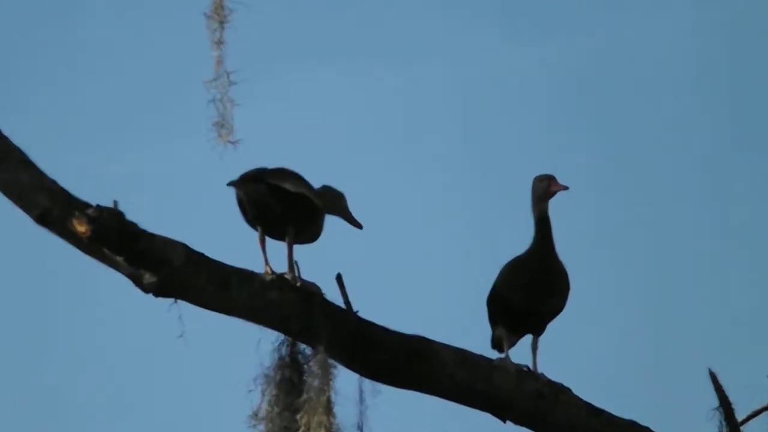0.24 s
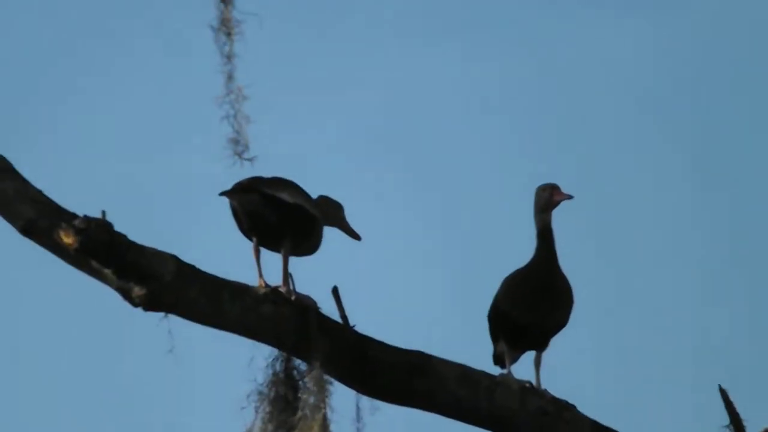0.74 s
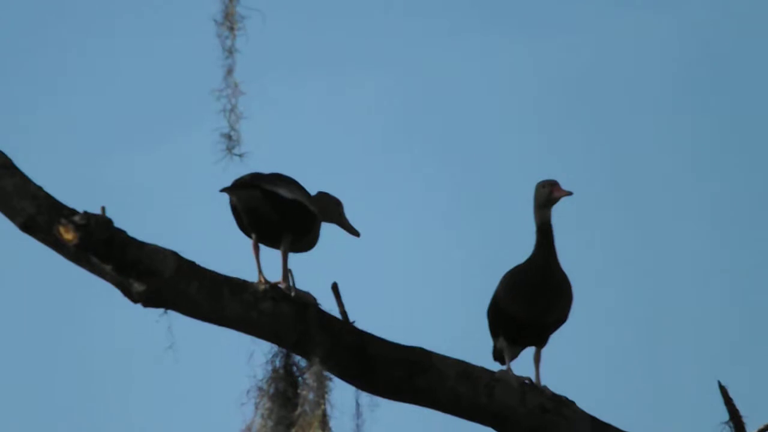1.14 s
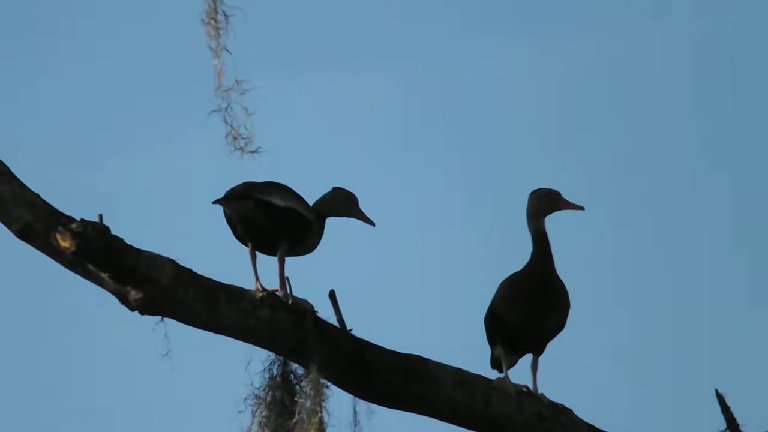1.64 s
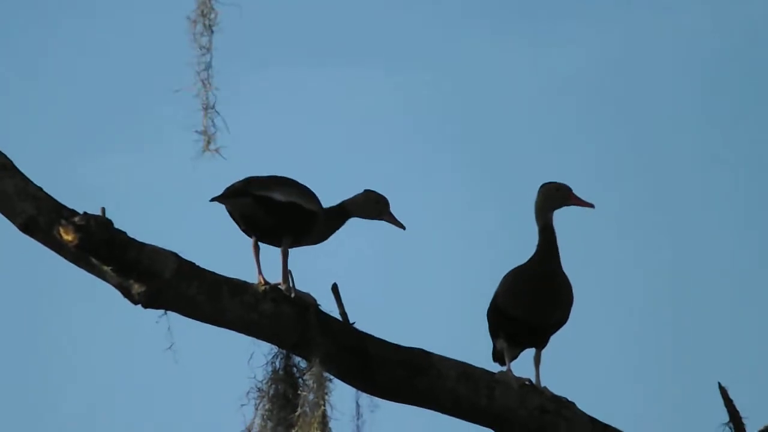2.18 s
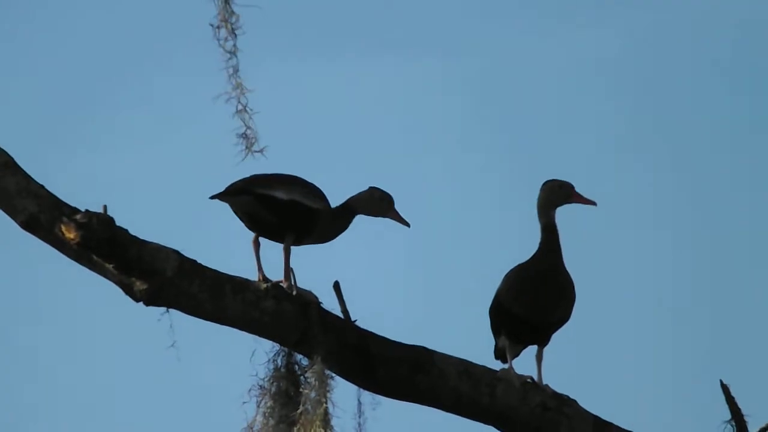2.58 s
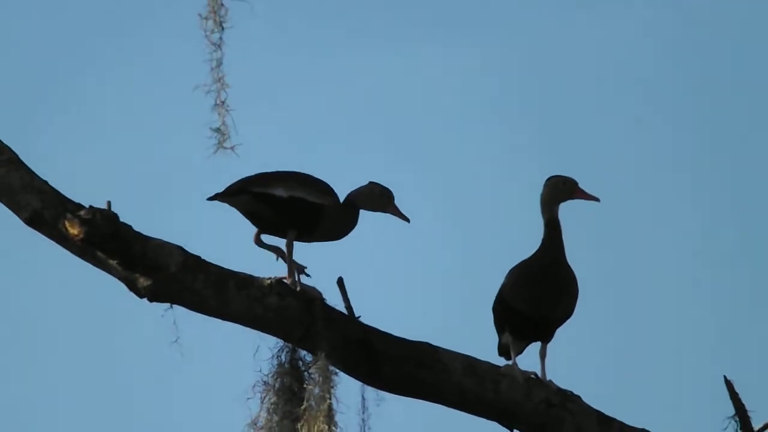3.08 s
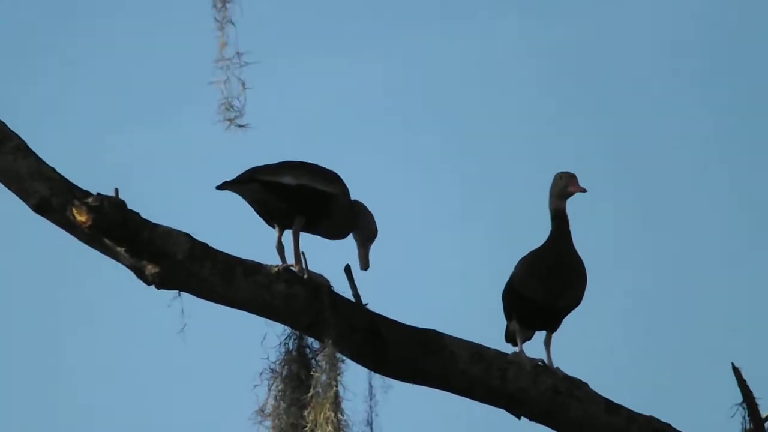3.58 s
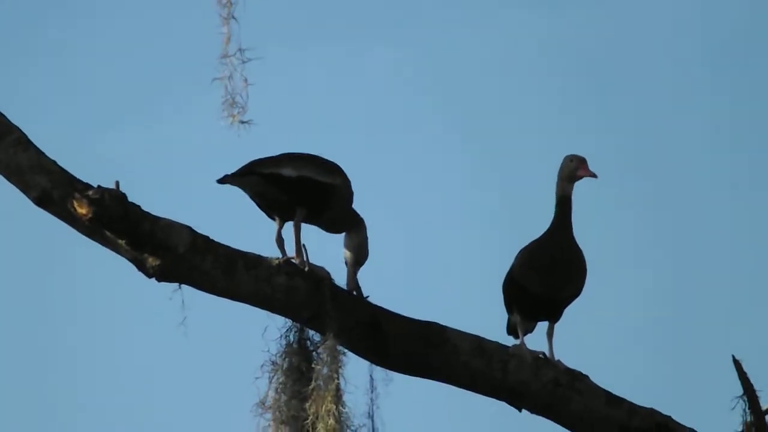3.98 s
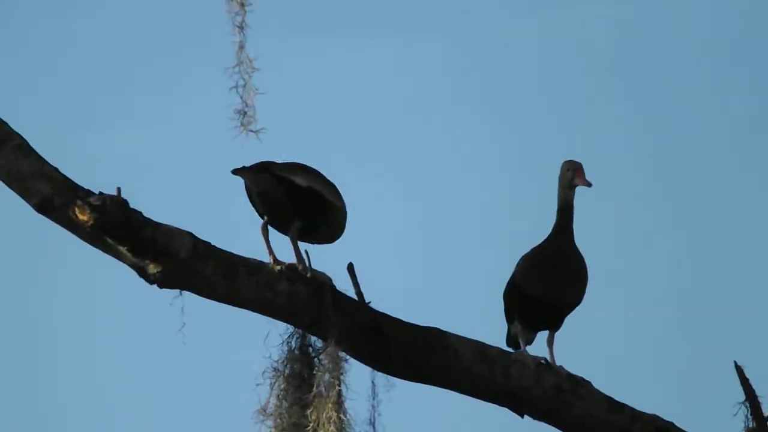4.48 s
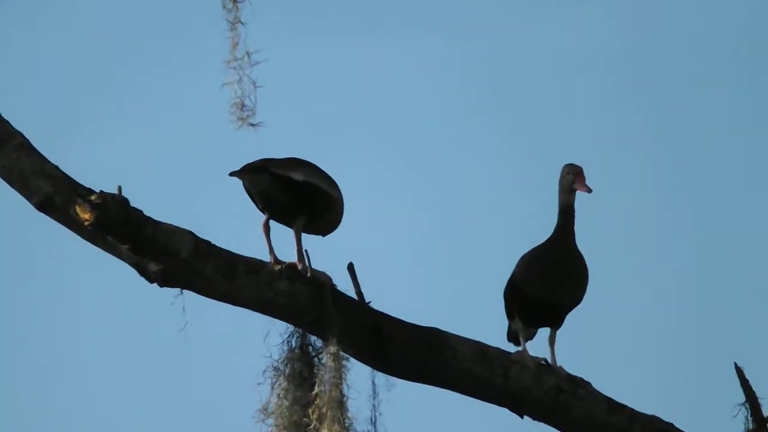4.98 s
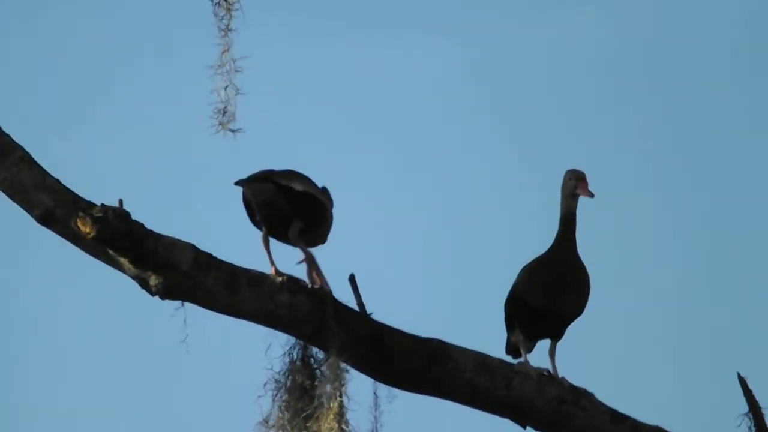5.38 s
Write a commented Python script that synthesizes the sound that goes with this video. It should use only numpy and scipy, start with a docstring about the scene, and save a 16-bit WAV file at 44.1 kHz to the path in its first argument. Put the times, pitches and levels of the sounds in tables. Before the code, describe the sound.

Close snap first, then a flock of whistling ducks: bright, nearly pure squeals that leap upward, a rapid chatter of short arched notes, and four strong whoops before the calls thin away. Trees and water scatter short echoes. The outdoor microphone also picks up hiss, low rumble, distant ringing frogs, fast insect chirps and a slowly rising engine hum.

```python
"""Whistling ducks over a wetland

A flock squeals, whoops and pips, several birds at once: nearly pure gliding tones with weak overtones,
heard direct and scattered by trees and water. Two snaps close by are struck bodies with fast-dying modes.
Behind lie a frog chorus of short rings, a chirping insect, thin whistles and faint squeals without
overtones, a far engine as a fuzzy hum, and outdoor hiss over low rumble."""
import sys
import numpy as np
from scipy import signal
from scipy.io import wavfile
from scipy.ndimage import uniform_filter1d

SR = 44100
rng = np.random.default_rng(int(sys.argv[2]) if len(sys.argv) > 2 else 0)


def wav_out(sig):
    """Save sig, one row per channel (or a flat mono array), as 16-bit PCM at SR to the path in sys.argv[1]."""
    wavfile.write(sys.argv[1], SR, np.round(np.clip(np.atleast_2d(sig).T, -1, 1) * 32767).astype(np.int16))


N = 248283  # length in samples

# Short duck notes. Each row: start in seconds, length in seconds, pitch in Hz at the start, at the turn
# and at the end, place of the turn as a share of the length, effort in dB before voice and throat.
PIPS = [(0.79, 0.031, 2060, 2285, 2110, 0.27, -37), (1.632, 0.045, 3210, 2890, 2940, 0.7, -33),
        (1.799, 0.027, 3460, 3380, 2410, 0.19, -39), (1.849, 0.027, 2860, 2845, 2720, 0.5, -24.5),
        (1.936, 0.034, 2840, 2800, 1870, 0.3, -27.5), (2.009, 0.09, 2073, 2872, 1960, 0.58, -20),
        (2.022, 0.016, 2710, 2790, 2640, 0.41, -25), (2.105, 0.032, 2780, 2850, 2690, 0.23, -20.5),
        (2.197, 0.015, 2700, 3077, 3270, 0.96, -18.5), (2.197, 0.028, 2240, 2440, 2520, 0.8, -37.5),
        (2.214, 0.04, 2890, 2960, 2150, 0.18, -30), (2.284, 0.015, 2705, 3024, 3090, 0.82, -19),
        (2.292, 0.021, 2370, 2430, 2130, 0.2, -34.5), (2.296, 0.039, 3440, 3530, 2470, 0.17, -25),
        (2.371, 0.014, 2746, 3005, 3070, 0.9, -20.5), (2.377, 0.052, 2214, 2516, 2520, 0.62, -34),
        (2.383, 0.037, 3280, 3524, 2380, 0.17, -24), (2.45, 0.016, 1930, 2230, 2220, 0.51, -34.5),
        (2.458, 0.011, 2800, 2944, 3000, 1, -21.5), (2.467, 0.046, 3700, 3500, 3090, 0.3, -23.5),
        (2.485, 0.034, 2570, 2510, 2220, 0.37, -38), (2.545, 0.011, 2830, 2970, 3060, 0.9, -24),
        (2.553, 0.034, 2290, 2346, 1970, 0.27, -29), (2.555, 0.042, 3500, 3566, 2420, 0.27, -20),
        (2.592, 0.027, 2500, 2600, 2200, 0.2, -36), (2.634, 0.015, 2830, 2924, 3000, 0.9, -26),
        (2.64, 0.031, 3190, 3600, 3160, 0.53, -20.5), (2.654, 0.049, 2350, 2346, 1710, 0.3, -28.5),
        (2.72, 0.098, 1993, 2492, 1850, 0.32, -27), (2.723, 0.055, 3255, 3550, 2660, 0.45, -20),
        (2.742, 0.04, 2730, 3094, 2620, 0.31, -27.5), (2.809, 0.014, 2790, 2830, 2860, 0.9, -27),
        (2.813, 0.05, 3200, 3410, 2430, 0.45, -22), (2.865, 0.038, 2055, 2135, 2180, 0.42, -34),
        (2.892, 0.057, 2150, 2194, 1780, 0.29, -29.5), (2.917, 0.042, 2955, 3510, 2270, 0.35, -23.5),
        (2.988, 0.058, 2260, 2326, 1720, 0.45, -27), (3.012, 0.04, 3060, 3500, 2360, 0.52, -22.5),
        (3.076, 0.031, 2420, 3020, 2730, 0.45, -27), (3.083, 0.025, 2250, 2240, 2140, 0.1, -36),
        (3.103, 0.06, 2145, 2298, 1784, 0.4, -29), (3.112, 0.043, 2970, 3580, 2500, 0.35, -23),
        (3.168, 0.044, 2840, 3083, 2830, 0.38, -24.5), (3.204, 0.054, 2920, 3600, 3050, 0.5, -23.5),
        (3.22, 0.05, 2470, 2340, 1740, 0.21, -29), (3.26, 0.05, 2810, 3235, 2970, 0.4, -20),
        (3.314, 0.033, 3054, 3510, 3130, 0.76, -24.5), (3.349, 0.018, 2814, 3207, 3280, 0.97, -17),
        (3.378, 0.011, 3100, 3010, 2690, 0.071, -22.5), (3.406, 0.034, 2490, 2465, 2060, 0.081, -32),
        (3.444, 0.019, 2870, 3234, 3300, 0.9, -17.5), (3.474, 0.0082, 2970, 2994, 2710, 0.072, -20),
        (3.494, 0.038, 3197, 3290, 2830, 0.58, -15.5), (3.529, 0.013, 2520, 2470, 2150, 0.085, -37),
        (3.539, 0.035, 2840, 3197, 2810, 0.37, -19), (3.592, 0.036, 1970, 2040, 1820, 0.28, -36),
        (3.633, 0.028, 2743, 3350, 3400, 0.85, -17), (3.707, 0.039, 2150, 2040, 1590, 0.077, -33),
        (3.734, 0.032, 2780, 3270, 2980, 0.42, -18), (3.814, 0.056, 1930, 2000, 1574, 0.29, -36.5),
        (3.923, 0.077, 1694, 2030, 1460, 0.27, -38), (4.031, 0.038, 2085, 2524, 2401, 0.85, -30.5),
        (4.066, 0.03, 2650, 2733, 2610, 0.31, -32), (4.079, 0.019, 2950, 3180, 3100, 0.7, -33),
        (4.15, 0.036, 2650, 2758, 2650, 0.35, -27), (4.175, 0.028, 2870, 3155, 3030, 0.53, -32.5),
        (4.233, 0.041, 2700, 2800, 2600, 0.57, -26.5), (4.268, 0.024, 2920, 3110, 3080, 0.81, -34),
        (4.325, 0.039, 2710, 2866, 2580, 0.43, -26.5), (4.412, 0.039, 2714, 2881, 2610, 0.6, -27),
        (4.499, 0.042, 2693, 2926, 2610, 0.55, -26.5), (4.542, 0.023, 2530, 2570, 2400, 0.4, -45),
        (4.59, 0.031, 2660, 2880, 2690, 0.62, -26.5), (4.684, 0.038, 2657, 2937, 2700, 0.7, -28.5),
        (4.785, 0.034, 2635, 2790, 2610, 0.51, -29), (5.366, 0.039, 1630, 1776, 1800, 0.57, -42.5),
        (5.47, 0.043, 1680, 1713, 1510, 0.31, -41.5), (5.56, 0.066, 1815, 1795, 1640, 0.09, -40)]
# Long squeals as curves; the one from 1.02 to 1.66 s runs over two of them.
# Each row of a curve: time in seconds, pitch in Hz, effort in dB.
SQUEALS = [
    [(0.765, 2035, -54), (0.785, 2740, -23.5), (0.81, 3320, -22.5), (0.845, 3397, -15), (0.867, 3320, -21),
     (0.88, 2840, -24.5), (0.908, 2620, -33)],
    [(1.02, 2543, -28), (1.035, 3610, -37), (1.055, 4340, -42), (1.072, 4340, -42.5), (1.086, 3167, -23),
     (1.15, 3090, -19), (1.195, 3183, -24), (1.23, 3265, -16), (1.25, 3590, -27), (1.275, 3676, -25),
     (1.295, 4555, -31), (1.32, 4700, -27), (1.43, 4720, -41.5), (1.46, 3510, -41.5), (1.48, 2640, -29)],
    [(1.485, 2603, -39), (1.5, 2615, -25), (1.52, 3340, -20.5), (1.555, 4300, -26), (1.585, 5540, -29.5),
     (1.63, 5550, -35.5), (1.66, 4650, -43)],
    [(1.705, 2677, -26), (1.73, 4110, -26), (1.765, 5465, -31.5), (1.79, 5480, -40.5), (1.81, 4800, -44)],
]
# Loud whoops. Each row: start in seconds, scoop in seconds, whole length in seconds, top pitch in Hz,
# effort in dB.
WHOOPS = [(3.591, 0.0097, 0.036, 3338, -12), (3.69, 0.019, 0.046, 3313, -13),
          (3.794, 0.018, 0.047, 3298, -12), (3.901, 0.018, 0.046, 3233, -13.5)]
# The scoop of a whoop. Each row: share of the scoop time, share of the top pitch, dB added to the effort.
SCOOP_SHAPE = [(0, 0.72, -20.5), (0.6, 0.8, -5.5), (1, 0.99, -1.5)]
WHOOP_FADE_DB = -10  # dB added to the effort at the end of the held top
# Thin whistles and faint squeals without overtones. Each row: start in seconds, length in seconds,
# pitch in Hz at the start, middle and end, level in dB before the throat.
THIN_WHISTLES = [(0.07, 0.17, 6130, 5900, 5590, -65), (0.24, 0.092, 3390, 3380, 3444, -40),
                 (0.29, 0.21, 5560, 5600, 5040, -60), (0.698, 0.088, 2920, 3520, 3330, -40),
                 (0.92, 0.37, 1593, 1260, 1010, -45), (1.1, 0.39, 2280, 2100, 1890, -47),
                 (1.865, 0.12, 3000, 3540, 2985, -36.5), (2.18, 0.081, 2330, 2046, 1990, -39.5),
                 (2.23, 0.14, 1950, 1954, 1910, -36.5), (2.522, 0.24, 1603, 1330, 1136, -44),
                 (3.57, 0.12, 1896, 1683, 1670, -44), (4.181, 0.22, 1600, 1367, 1154, -43),
                 (4.29, 0.13, 3200, 3430, 3200, -43.5), (4.9, 0.12, 1890, 1940, 1982, -52),
                 (5.105, 0.12, 6150, 5600, 5300, -57), (5.11, 0.1, 5070, 5050, 4980, -63),
                 (5.115, 0.21, 7800, 6930, 6300, -56), (5.139, 0.23, 8600, 7860, 7600, -56),
                 (5.171, 0.044, 3114, 3020, 2815, -45), (5.421, 0.072, 3060, 3015, 2970, -44.5)]
# The voice; low pitches lean on the second partial. Each row: pitch in Hz, then the level in dB
# of each of the first four partials.
VOICE = [(1750, -2, 0.7, -8.5, -23), (2380, -1.5, 1.2, -16.5, -25.5), (2564, -1, -4.5, -16.5, -24),
         (2624, -1.6, -15.5, -30.5, -45.5), (3050, 3.66, -19, -40, -48), (3256, 0.8, -27, -32.5, -44.5),
         (3450, -1.96, -22, -33.5, -49), (5000, -1.1, -30.5, -45.5, -57)]
LONG_PURER_DB = -5  # overtones of squeals and whoops are weaker
# What the bird radiates well. Each row: frequency in Hz, gain in dB.
THROAT = [(1900, -9), (2700, 5.5), (9500, -1), (12500, -20.5)]
# High long notes turn grainier. Each row: pitch in Hz, depth of the grain as a factor.
STRAIN = [(3300, 0.14), (4500, 0.4)]
# Corners of a pip's pitch arch: square rise in high voices, squarest fall near 2900 Hz.
# Each row: pitch at the turn in Hz, power before the turn, power after it.
CORNERS = [(2417, 0.99, 1.2), (2920, 2.6, 2.6), (3350, 2.4, 1.2)]
PIP_LOUDEST = 0.18  # share of the length
SLACK_DB_PER_OCTAVE = 8.5  # a pip weakens as its pitch drops under its top
# Echo decay among trees and water. Each row: frequency in Hz, time to fall 60 dB in seconds.
WOODS = [(1500, 0.55), (3000, 0.26), (6000, 0.46), (12000, 0.18)]
# Snaps near the microphone. Each row: start in seconds, level in dB, ring time as a factor.
SNAPS = [(.3033, -25, .3), (.3266, 5, 1)]
# Modes of the struck body. Each row: frequency in Hz, level in dB before the snap's own level,
# time to fall 60 dB in seconds before the snap's ring factor.
SNAP_BODY = [(1540, -9, .025), (1780, -13, .025), (2140, -10, .025), (2570, -8, .025), (3060, -2, .027),
             (3340, 0, .027), (3840, -12, .03), (5300, -13, .02), (8200, -12, .012), (10000, -9, .012),
             (14800, -22, .01)]
# Loudness of the frog chorus. Each row: time in seconds, level in dB.
FROGS = [(0, -34), (.3, -39), (.7, -46.5), (2, -37.5), (4, -42), (5, -51), (5.63, -42)]
# Loudness of a far engine near 100 Hz. Each row: time in seconds, level in dB.
RUMBLE = [(0, -49), (3.6, -44.5), (5.63, -37)]
# Colour of the outdoor air. Each row: frequency in Hz, relative level in dB per Hz.
AIR = [(12, -42), (22, 4.5), (114, -15), (190, -21.5), (480, -30), (1000, -33), (1800, -32), (2600, -29),
       (4000, -31), (5500, -47), (7500, -47.5), (11000, -53.5), (16000, -54)]
AIR_DB = -36  # rms level of the air
EDGE_HZ = 15800  # upper band limit


def gain_of(db):
    """Turns decibels into a factor."""
    return 10 ** (np.asarray(db) / 20)


def evened(x):
    """Scales to rms 1."""
    return x / np.sqrt(np.mean(x ** 2) + 1e-20)


def read(points, hz):
    """Reads a curve on a log-frequency axis."""
    f, value = np.transpose(points)
    return np.interp(np.log(hz + 1), np.log(f + 1), value)


def level(curve):
    """Turns a curve of seconds and dB into a gain for every sample."""
    return gain_of(np.interp(np.arange(N) / SR, *np.transpose(curve)))


def add(mix, s, sound):
    """Mixes a sound in at time s."""
    part = mix[round(s * SR):][:len(sound)]
    part += sound[:len(part)]


def drift(length, size):
    """Random wandering of rms 1, smoothed twice over size samples."""
    once = uniform_filter1d(rng.standard_normal(length), size)
    return evened(uniform_filter1d(once, size))


def resonate(x, hz, width):
    """A resonance of gain 1: shifts hz down to zero, smooths, and shifts back."""
    turn = np.exp(2j * np.pi * np.cumsum(hz * np.ones(len(x))) / SR)
    r = np.exp(-np.pi * width / SR)
    smooth = signal.lfilter([1 - r], [1, -r], x / turn)
    return 2 * (turn * smooth).real


def whistle(hz, partials_db, step_db=-12):
    """A nearly pure tone with a slight waver; several partials gain one more, a step under the last."""
    waver, flutter_db, breath = .002, .9, .25  # share of pitch, dB, roughness per overtone
    wavering_hz = hz * (1 + waver * drift(len(hz), size=120))
    turns = 2 * np.pi * np.cumsum(wavering_hz) / SR
    if len(partials_db) > 1:
        partials_db = list(partials_db) + [partials_db[-1] + step_db]
    tone = 0
    for k, db in enumerate(partials_db, 1):
        flutter = flutter_db * np.sqrt(k) * drift(len(hz), size=200)
        rasp = 1 + breath * (k - 1) * drift(len(hz), size=40)  # turbulent air roughens the overtones
        gain = gain_of(db + read(THROAT, k * hz) + flutter)
        tone = tone + rasp * gain * np.sin(k * turns) * (k * hz < EDGE_HZ)
    return tone


def partials(hz):
    """Balance of the first four partials in dB for a voice at pitch hz."""
    f, *columns = np.transpose(VOICE)
    return [np.interp(hz, f, db) for db in columns]


def pip(s, length, start_hz, turn_hz, end_hz, turn, db):
    """One short note: pitch bends through its turn; the level swells early and dies."""
    u = np.linspace(0, 1, round(length * SR))
    turn = np.clip(turn, .05, .95)
    f, rise, fall = np.transpose(CORNERS)
    before = (1 - u / turn).clip(0) ** np.interp(turn_hz, f, rise)
    after = ((u - turn) / (1 - turn)).clip(0) ** np.interp(turn_hz, f, fall)
    hz = turn_hz + (start_hz - turn_hz) * before + (end_hz - turn_hz) * after
    quarter_turns = np.interp(u, [0, PIP_LOUDEST, 1], [0, 1, 2])
    swell = np.sin(np.pi / 2 * quarter_turns).clip(0) ** .45
    db = db + SLACK_DB_PER_OCTAVE * np.log2(hz / hz.max())
    return s, whistle(hz, [db + level_db for level_db in partials(turn_hz)]) * swell


def glide(rows):
    """A long note, or part of one, whose pitch and effort follow a curve, with grain on its level."""
    s, hz, db = np.transpose(rows)
    t = np.arange(s[0], s[-1], 1 / SR)
    hz = uniform_filter1d(np.interp(t, s, hz), size=120, mode="nearest")
    db = np.interp(t, s, db)
    edges = np.clip(np.minimum(t - s[0], s[-1] - t) / .006, 0, 1)  # 6 ms fades
    grain = 1 + read(STRAIN, hz) * drift(len(t), size=90)
    first_db, *overtones_db = partials(hz)
    voice_db = [db + first_db] + [db + level_db + LONG_PURER_DB for level_db in overtones_db]
    return s[0], whistle(hz, voice_db) * edges * grain


def whoop(s, scoop, length, top_hz, db):
    """A scoop up to the top pitch, held while it fades."""
    rise = [(s + part * scoop, share * top_hz, db + rise_db) for part, share, rise_db in SCOOP_SHAPE]
    return glide(rise + [(s + length, top_hz, db + WHOOP_FADE_DB)])


def thin_whistle(s, length, start_hz, middle_hz, end_hz, db, swell=0.26):
    """A single partial on a smooth pitch bend, swelling and fading."""
    u = np.linspace(0, 1, round(length * SR))
    bend = 2 * (2 * middle_hz - start_hz - end_hz) * u * (1 - u)
    hz = start_hz + (end_hz - start_hz) * u + bend
    return s, whistle(hz, [db]) * np.sin(np.pi * u).clip(0) ** swell


def woods(x):
    """Trunks and water scatter the sound: sparse taps of random sign, each band dying at its own speed."""
    taps = np.zeros(SR)
    at = np.arange(120, SR - 20, 20)
    taps[at + rng.integers(0, 20, len(at))] = rng.choice([-1., 1.], len(at))
    hz, t, z = signal.stft(taps, SR, nperseg=256)
    build_up = np.clip(t / .025, .45, 1)  # few trees stand close
    decay = gain_of(-60 * t / read(WOODS, hz)[:, None])
    tail = signal.istft(z * build_up * decay, SR, nperseg=256)[1]
    return signal.fftconvolve(x, tail / np.linalg.norm(tail))[:N]


def birds(echo_db=-7):
    """All calls, direct and scattered."""
    direct = np.zeros(N)
    for call, table in ((pip, PIPS), (whoop, WHOOPS), (thin_whistle, THIN_WHISTLES)):
        for row in table:
            add(direct, *call(*row))
    for rows in SQUEALS:
        add(direct, *glide(rows))
    leaves = 1 + .5 * drift(N, size=150)  # moving leaves blur the pitch of the echoes
    return direct + gain_of(echo_db) * woods(direct * leaves)


def snaps():
    """A small hard body is struck; all its modes start at once and die fast, with a crack of noise."""
    out, t = np.zeros(N), np.arange(2000) / SR
    for s, db, ring in SNAPS:
        modes = 0
        for hz, mode_db, t60 in SNAP_BODY:
            fade = gain_of(mode_db - 60 * t / (t60 * ring))
            modes = modes + fade * np.sin(2 * np.pi * (hz * t + rng.random()))
        noise = evened(resonate(rng.standard_normal(len(t)), 3300, 3000))
        crack = gain_of(-16.5 - 60 * t / 0.014) * noise
        attack = np.minimum(t / 0.0012, 1)
        add(out, s, gain_of(db) * (modes + crack) * attack)
    return out


def frogs(per_s=400, spread_db=3):
    """Many small far callers around 3 kHz: random clicks of uneven size set off short rings."""
    out, t = np.zeros(N), np.arange(400) / SR
    for hz in np.linspace(2600, 3550, num=16):
        struck = rng.random(N) < per_s / 16 / SR
        clicks = struck * gain_of(spread_db * rng.exponential(1, N).clip(0, 4))
        ring = np.sin(2 * np.pi * hz * t) * np.hanning(len(t))
        out += signal.oaconvolve(clicks, ring)[:N]
    return level(FROGS) * evened(out + woods(out))


def insect(db=-50, share=0.76):
    """Regular chirps that each slide down in pitch and fill a share of their period."""
    per_s, first_s = 19.5, .016  # chirps a second, offset in seconds
    u = ((np.arange(N) / SR - first_s) * per_s % 1) / share
    hz = np.interp(u, [0, 1], [4150, 3850])
    chirps = np.sin(np.pi * u.clip(0, 1)) * np.sin(2 * np.pi * np.cumsum(hz) / SR)
    wandering = gain_of(db + 2.5 * drift(N, size=900))
    return wandering * (chirps + .6 * woods(chirps))


def rumble():
    """A far engine as a fuzzy hum: noise through two equal narrow resonances."""
    once = resonate(rng.standard_normal(N), 99.3, 30)
    return level(RUMBLE) * evened(resonate(once, 99.3, 30))


def air(patchy_db=2.0):
    """Outdoor hiss and low rumble: random short-time spectra with drifting patches."""
    frames, hz = N // 256 + 5, np.fft.rfftfreq(1024, 1 / SR)
    a, b, patches = rng.standard_normal((frames, 513, 3)).T
    patches = uniform_filter1d(patches, size=12, axis=0)  # across frequency
    patches = evened(uniform_filter1d(patches, size=14, axis=1))  # across time
    z = (a + 1j * b) * gain_of(read(AIR, hz)[:, None] + patchy_db * patches)
    hiss = signal.istft(z, nperseg=1024, noverlap=768)[1][:N]
    return gain_of(AIR_DB) * evened(hiss)


def scene():
    """One sound field reaching both microphone ports."""
    return np.tile(birds() + air() + rumble() + frogs() + insect() + snaps(), (2, 1))


def record(dry):
    """The input clips, gain control dips after loud peaks, the left port lags, then the band limit."""
    clipped = np.clip(dry[0], -1, 1)
    peak_db = 20 * np.log10(abs(clipped) + 1e-9)
    fall = np.arange(N) * 17. / SR  # recovers 17 dB a second
    held_db = np.maximum.accumulate(peak_db + fall) - fall
    over_db = np.maximum(held_db + 4.5, 0)  # excess over -4.5 dB
    late_db = np.roll(uniform_filter1d(over_db, size=100), 260)  # the dip acts some 5 ms late
    right = clipped / gain_of(late_db)
    left = np.roll(right, 1)  # one sample late
    treble = signal.butter(3, 1300, "high", fs=SR, output="sos")  # the bass stays mono
    mid = (left + right) / 2
    side = signal.sosfiltfilt(treble, left - right) / 2
    both = np.array([mid + side, mid - side])
    band_limit = signal.firwin(511, EDGE_HZ, window=("kaiser", 9), fs=SR)
    return signal.oaconvolve(both, band_limit[None], "same")


dry = scene()
out = record(dry)
wav_out(out)
```